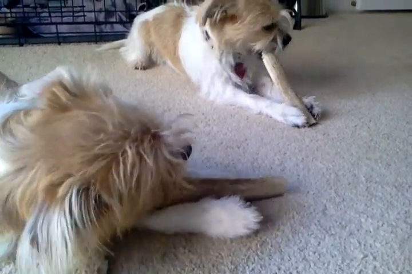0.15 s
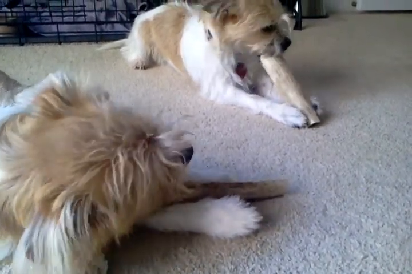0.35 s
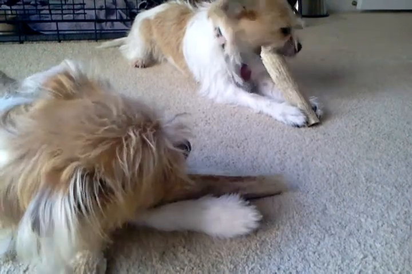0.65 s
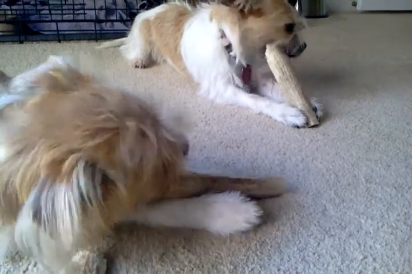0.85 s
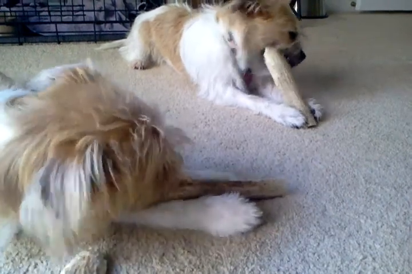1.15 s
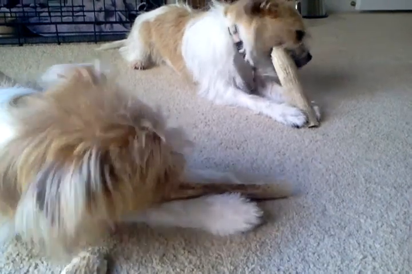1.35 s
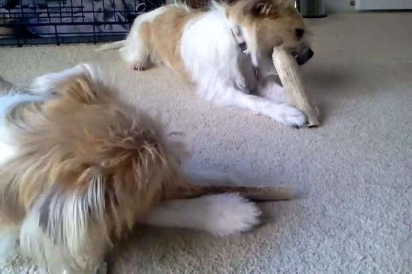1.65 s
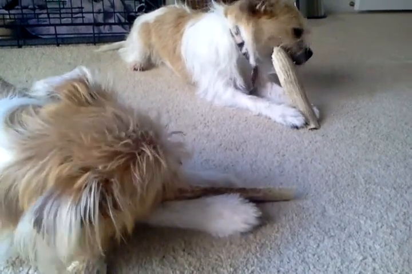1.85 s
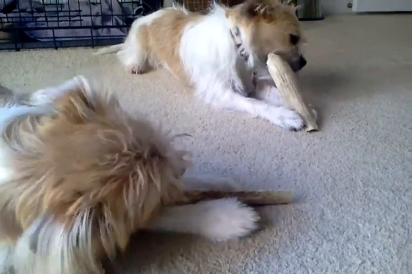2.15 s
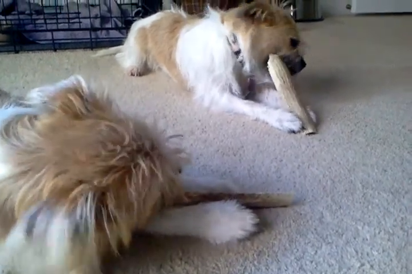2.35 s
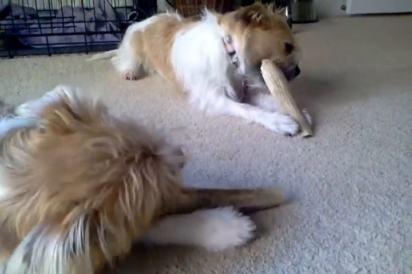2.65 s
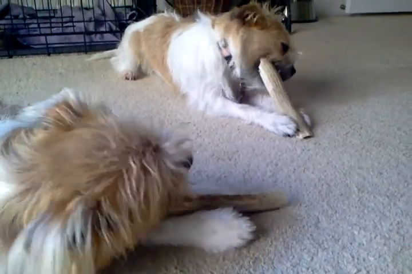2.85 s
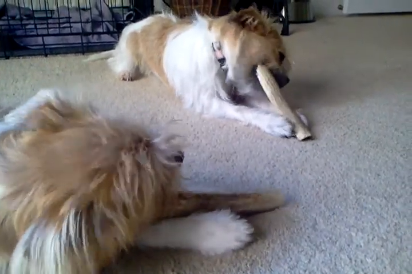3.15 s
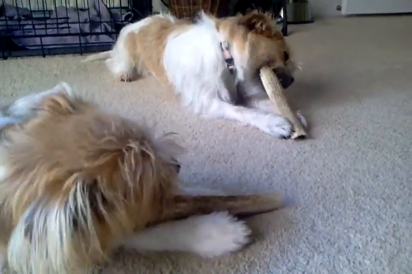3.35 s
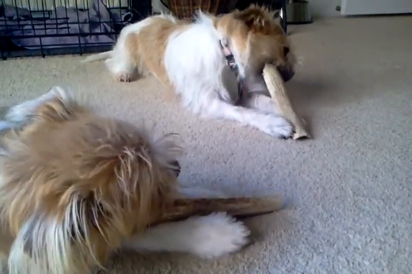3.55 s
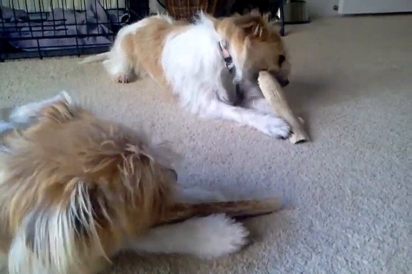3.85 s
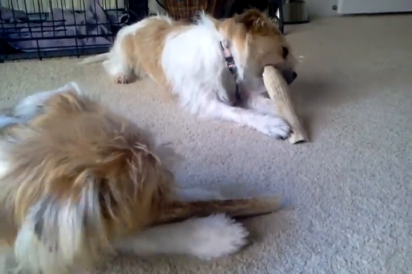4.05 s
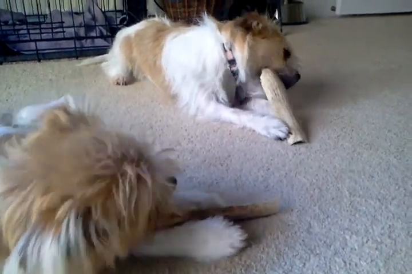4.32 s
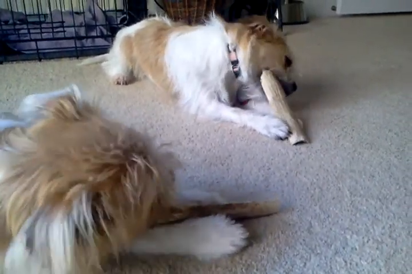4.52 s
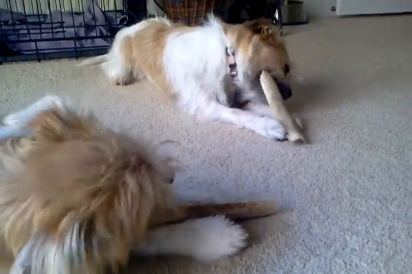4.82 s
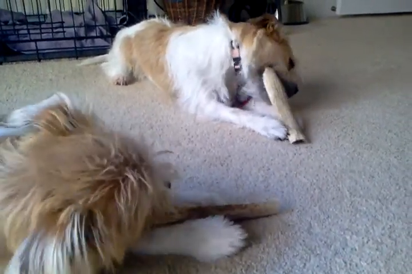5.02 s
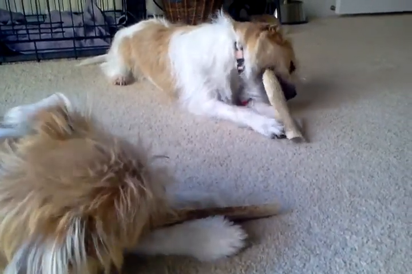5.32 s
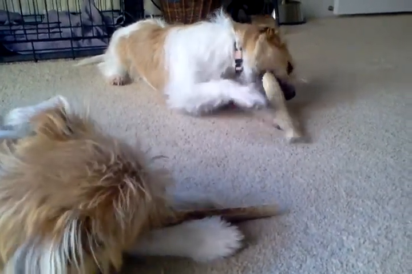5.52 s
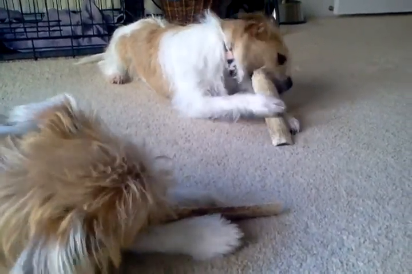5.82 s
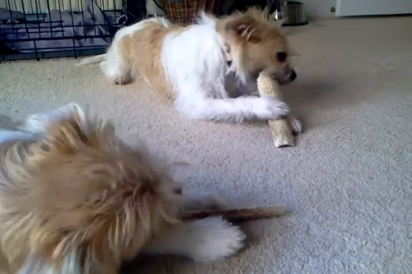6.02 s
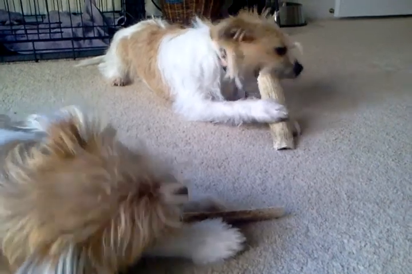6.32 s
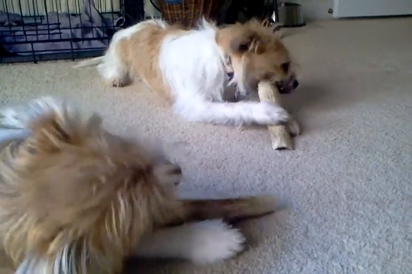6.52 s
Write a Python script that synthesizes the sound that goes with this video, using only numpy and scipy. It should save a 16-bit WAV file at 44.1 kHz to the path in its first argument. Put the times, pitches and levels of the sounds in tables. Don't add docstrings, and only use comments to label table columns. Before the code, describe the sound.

A quiet carpeted room with gentle hiss, low house hum and a very short, faint tail, heard through a dull narrow-band microphone. A near dog gnaws a hard antler: dry, bright tooth ticks with tiny rings, and barely audible gritty gnawing between. Light clicks scatter from 0.2 to 0.5 s, then a small cluster with hollow knocks around 0.7-0.8. A firmer click lands at 1.35, with weaker ones to 1.9. At 2.15 a brief skid leads into by far the loudest sound, a sharp splintering crack. At 2.6 a hard double bite comes with a low, short thump on the floor. Softer ticks follow, then a firm cluster at 3.9 with a hollow knock. Isolated clicks come at 4.2, 4.5, 4.8 and 5.3, more around 5.5-5.9, and faint low ticks to the end near 6.6. Throughout, a farther dog adds faint, noisy ticks.

```python
import sys
import numpy as np
from scipy import signal
from scipy.fft import rfft, irfft
from scipy.io import wavfile
from scipy.ndimage import map_coordinates

SR = 44100
rng = np.random.default_rng(int(sys.argv[2]) if len(sys.argv) > 2 else 0)


def persist_wave(psi):
    counts = np.round(np.clip(psi, -1, 1) * 32767).astype(np.int16)
    wavfile.write(sys.argv[1], SR, np.atleast_2d(counts).T)


def makeup_ratio(level_db):
    decades = np.asarray(level_db, float) / 20
    return 10 ** decades


N = 294588


def resonate(x, hz, width_hz):
    r = np.exp(-np.pi * width_hz / SR)
    feedback = [1, -2 * r * np.cos(2 * np.pi * hz / SR), r * r]
    return signal.lfilter([(1 - r * r) / 2, 0, (r * r - 1) / 2], feedback, x)


def add(out, start_s, sound):
    i = int(start_s * SR)
    out[i:i + len(sound)] += sound[:N - i]


def contacts(rows, splinter_s, splinter_db, crack_db, widen, mode_db=0, mode_width_hz=350):
    out, t = np.zeros(N), np.arange(900) / SR
    chance = rng.standard_normal((len(rows), 900))
    for (start_s, peak_db, snap_hz, width_hz, *modes_hz), noise in zip(rows, chance):
        force = makeup_ratio(splinter_db) * noise * np.exp(-t / splinter_s)
        force[12] = np.sign(noise[0])
        snap = resonate(force, snap_hz, widen * width_hz)
        snap = resonate(snap, snap_hz, widen * width_hz)
        crack = resonate(resonate(force, 3000, 5000), 3000, 5000)
        sound = snap / abs(snap).max() + makeup_ratio(crack_db) * crack / abs(crack).max()
        for k, mode_hz in enumerate(modes_hz):
            ring = resonate(force, mode_hz, mode_width_hz)
            sound += makeup_ratio(mode_db - 3 * k) * ring / abs(ring).max()
        add(out, start_s - .0004, makeup_ratio(peak_db) * sound / abs(sound).max())
    return out


def gripped(ticks, antler_hz):
    rows = []
    for start_s, peak_db, tooth_hz in ticks:
        snap_hz = tooth_hz + 0.19 * (antler_hz - tooth_hz)
        width_hz = 700 + 0.96 * abs(antler_hz - tooth_hz)
        rows.append((start_s, peak_db, snap_hz, width_hz, tooth_hz, antler_hz))
    return rows


def tooth_ticks():
    # start_s, peak_db, tooth_hz
    base_ticks = [(.2269, -38.5, 6000), (.433, -42, 4470), (.9356, -39.5, 4560), (2.5969, -24, 3620),
                  (2.605, -36, 2370), (2.6088, -33, 2370), (3.0631, -36.5, 4770), (3.6317, -42, 2760),
                  (3.8888, -29, 5220), (3.894, -25, 5100), (4.239, -39, 6000), (5.5496, -35, 5400),
                  (5.8194, -27, 5200), (5.8666, -45, 5340), (5.9037, -37.5, 2850), (6.4726, -39, 2080),
                  (6.5627, -39, 2000), (6.6106, -41, 2200), (6.6383, -34.5, 2570)]
    # start_s, peak_db, tooth_hz
    shaft_ticks = [(.2732, -40.5, 2430), (.3569, -40, 2580), (.4416, -31.5, 5630), (.7236, -34, 2880),
                   (.7609, -39, 6380), (.8139, -26.5, 5230), (.8221, -32, 2550), (.9844, -41.5, 2930),
                   (1.3493, -24, 2720), (1.592, -34, 3520), (1.9345, -39.5, 3700), (1.9421, -40, 3140),
                   (2.1456, -18, 3380), (2.1507, -23, 2950), (2.368, -39, 3250), (3.0388, -45, 3190),
                   (3.7314, -41, 3170), (5.2931, -46, 3600), (6.1049, -42, 2960), (6.1873, -39, 3100)]
    # start_s, peak_db, tooth_hz
    neck_ticks = [(.7859, -40.5, 2070), (1.3585, -45, 2000), (1.7427, -36, 2370), (2.702, -36.5, 3700),
                  (2.835, -37, 2460), (3.8812, -26.5, 4280), (4.2255, -30.5, 2180), (4.5317, -31.5, 3350),
                  (5.2476, -37.5, 3280), (5.3461, -32, 1920), (5.9152, -45, 3070), (5.9292, -26.5, 3120)]
    # start_s, peak_db, tooth_hz
    tip_ticks = [
        (.4386, -32, 5560),
        (.8199, -33, 5090),
        (2.5928, -18.5, 4550),
        (3.8917, -24, 5100),
        (4.8274, -37.5, 5260),
        (5.4884, -32, 5270),
        (5.6625, -29.5, 5300),
    ]
    rows = gripped(base_ticks, antler_hz=3230) + gripped(shaft_ticks, antler_hz=4270)
    rows += gripped(neck_ticks, antler_hz=5520) + gripped(tip_ticks, antler_hz=6260)
    return contacts(rows, splinter_s=.0012, splinter_db=-18, crack_db=-10, widen=1.5,
                    mode_db=-1, mode_width_hz=520)


def splinter_breaks():
    # start_s, peak_db, snap_hz, snap_width_hz, first_mode_hz, second_mode_hz
    breaks = [
        (2.1539, -5, 3400, 1250, 2950, 5200),
        (3.9175, -34, 3700, 2400, 3030, 5170),
    ]
    return contacts(breaks, splinter_s=.001, splinter_db=-24, crack_db=-12, widen=1.5,
                    mode_db=-5, mode_width_hz=430)


def hollow_knocks():
    # start_s, peak_db, snap_hz, snap_width_hz
    knocks = [(0.2738, -34, 804, 580), (0.786, -32, 970, 670), (0.8205, -40.5, 735, 1250),
              (1.3492, -30, 1060, 534), (1.3587, -35.5, 950, 790), (1.5919, -39, 1480, 1050),
              (1.743, -37.5, 1230, 370), (2.1462, -24, 1000, 620), (2.1538, -21, 1220, 1140),
              (2.3821, -38, 1780, 1210), (2.4152, -38, 630, 1190), (2.5887, -28, 990, 1200),
              (2.5968, -24.5, 375, 402), (2.8343, -41.5, 1060, 610), (3.8814, -34, 1920, 590),
              (3.8989, -25.5, 1320, 1160), (4.2268, -37, 760, 1450), (4.5316, -36, 1420, 1040),
              (4.8129, -37, 575, 735), (5.3457, -31.5, 970, 1090), (5.9036, -37.5, 714, 597),
              (5.916, -37, 1120, 540), (6.0297, -44.5, 650, 680), (6.1874, -45, 520, 500),
              (6.6106, -50, 1880, 1170), (6.6383, -37, 1080, 920)]
    return contacts(knocks, splinter_s=.0015, splinter_db=-18, crack_db=-22, widen=1.45)


def far_dog_ticks():
    # start_s, peak_db, snap_hz
    far_ticks = [(.0867, -56, 3550), (.316, -49, 6180), (1.1303, -51, 3530), (1.3744, -56, 3730),
                 (1.9685, -51, 3710), (2.345, -46, 4240), (2.878, -48, 3750), (3.0684, -53, 5460),
                 (3.1535, -44.5, 5500), (3.6134, -51, 4830), (4.373, -46, 6100), (4.5575, -48, 5680),
                 (4.6595, -48, 3550), (4.8125, -46, 6200), (4.9864, -47, 3500), (5.1883, -45, 4900),
                 (5.3374, -43, 6010), (5.5584, -46, 5250), (5.7326, -46, 3600), (6.1543, -48, 3630),
                 (6.204, -49.5, 5300)]
    rows = [(start_s, peak_db, snap_hz, 2500) for start_s, peak_db, snap_hz in far_ticks]
    return contacts(rows, splinter_s=.0022, splinter_db=-4.5, crack_db=-10, widen=1.1)


def scrapes():
    # start_s, length_s, rms_db, ring_hz, ring_width_hz
    skids = [(1.355, 0.019, -50, 1210, 1510), (1.356, 0.0091, -52, 5930, 1500),
             (2.146, 0.01, -32.5, 3970, 3000), (2.1466, 0.0091, -39, 1000, 700),
             (2.5885, 0.0073, -35.5, 4600, 3000), (2.5889, 0.014, -44.5, 2020, 2000),
             (2.597, 0.0045, -45, 5000, 3500), (3.886, 0.015, -40.5, 5200, 1600),
             (3.894, 0.0088, -38.5, 2470, 2000), (4.229, 0.0039, -52, 2000, 3500),
             (4.56, 0.0073, -56.5, 5960, 2000), (5.342, 0.0053, -50, 1410, 1800),
             (5.861, 0.016, -56, 5400, 1300), (5.745, 0.0096, -60, 1100, 900),
             (5.908, 0.015, -52, 1200, 1500), (6.199, 0.017, -57, 1300, 1500)]
    out = np.zeros(N)
    chance = rng.random((len(skids), 2, 1200))
    for (start_s, length_s, rms_db, ring_hz, width_hz), (when, size) in zip(skids, chance):
        slips = (when < 5000 / SR) * np.tan(0.65 * (size - .5))
        slips = slips * (np.arange(1200) < length_s * SR)
        ring = resonate(resonate(slips, ring_hz, width_hz), ring_hz, width_hz)
        rms = np.sqrt(np.sum(ring ** 2) / (length_s * SR))
        add(out, start_s, makeup_ratio(rms_db) * ring / rms)
    return out


def thumps():
    # start_s, peak_db, pitch_hz
    soft_blows = [(.274, -41.5, 560), (.2745, -38, 1020), (.8215, -43.5, 497), (1.3502, -42.5, 463),
                  (1.36, -43, 350), (2.156, -35, 355), (2.157, -39, 206), (2.599, -28, 1020),
                  (2.622, -43, 410), (3.899, -36, 1600), (3.9, -38, 417), (3.9185, -44, 600),
                  (3.9005, -39, 760), (4.226, -43, 212), (4.227, -39.5, 730), (4.228, -42.5, 457),
                  (4.532, -43.5, 337), (4.813, -41.5, 584), (5.346, -40.5, 453), (5.756, -44, 1116),
                  (6.188, -44.5, 467), (6.639, -48, 407)]
    # pitch_hz, peak_db, t60_s
    slam_modes = [
        (234, -45.5, 0.08),
        (290, -41, .28),
        (353, -27, .055),
        (440, -33, .025),
    ]
    slam_s, cycles = 2.5962, 13.8
    out, t = np.zeros(N), np.arange(SR // 4) / SR
    blows = [(start_s, db, hz, cycles / hz) for start_s, db, hz in soft_blows]
    blows += [(slam_s, db, hz, t60_s) for hz, db, t60_s in slam_modes]
    for start_s, peak_db, hz, t60_s in blows:
        envelope = makeup_ratio(peak_db - 60 * t / t60_s) * (1 - np.exp(-t / 0.00052))
        add(out, start_s, envelope * np.sin(2 * np.pi * hz * t))
    return out


def grit():
    contacts_per_s, level_db = 77, -52.5
    size_db = level_db + 3.5 * np.minimum(rng.exponential(1, N), 3)
    sizes = makeup_ratio(size_db) * rng.choice([-1, 1], N)
    born = rng.random(N) < contacts_per_s / SR
    dealt = rng.integers(0, 8, N)
    out = np.zeros(N)
    for k, hz in enumerate(np.geomspace(700, 6000, 8)):
        clicks = sizes * born * (dealt == k) + 1e-18
        out += resonate(clicks, hz, .5 * hz) * SR / (np.pi * hz)
    return out


def muffle(bites):
    return signal.sosfilt(signal.butter(2, 7000, fs=SR, output="sos"), bites)


def room(x):
    # delay_s, level_db
    echoes = [
        (.004, -20),
        (.0095, -31),
        (.018, -30),
        (.0280, -24),
        (.034, -27),
    ]
    # band_hz, t60_s
    tail_bands = [(300, 0.22), (1000, 0.26), (2500, 0.18), (5000, .22), (8000, 0.13)]
    tail_db = -47.5
    t = np.arange(SR // 2) / SR
    response, white = np.zeros(len(t)), rng.standard_normal((2, len(t)))
    for hz, t60_s in tail_bands:
        band = resonate(white[0], hz, 0.99 * hz)
        response += makeup_ratio(tail_db - 60 * t / t60_s) * band / band.std() * (1 - np.exp(-t / 0.018))
    for delay_s, level_db in echoes:
        response += makeup_ratio(level_db - 16) * white[1] * np.exp(-np.abs(t - delay_s) / .0012)
    return signal.fftconvolve(x, response)[:N]


def colour(x, points):
    table_hz, table_db = np.transpose(points)
    hz = np.fft.rfftfreq(len(x), 1 / SR)
    gain_db = np.interp(np.log(hz + 1), np.log(table_hz), table_db)
    return irfft(rfft(x) * makeup_ratio(gain_db), len(x))


def drift(rate_hz):
    knots = rng.standard_normal(400)
    return map_coordinates(knots, [np.arange(N) / SR * min(rate_hz, 50)], order=3)


def house():
    # pitch_hz, density_db (dB per Hz)
    spectrum = [(20, -33), (48, -19.5), (64, -21.5), (100, -6), (125, -11), (190, -3.5), (260, -7),
                (330, -8), (500, -15.5), (680, -9.5), (1500, -13.5), (2300, -12), (3800, -22.5),
                (9500, -25)]
    # time_s, level_db
    bustle = [(0.0, -1.5), (0.9, -0.04), (1.7, -0.4), (2.6, 1), (3.3, -.4), (5.3, 0.5), (5.95, 1.5),
              (6.68, 0.6)]
    bustle_db = np.interp(np.arange(N) / SR, *np.transpose(bustle))
    noise = colour(rng.standard_normal(N), spectrum)
    rumble = signal.sosfiltfilt(signal.butter(2, 400, fs=SR, output="sos"), noise)
    hiss = noise - rumble
    rumble_gain = makeup_ratio(-61 + 0.37 * bustle_db + 1.7 * drift(6))
    hiss_gain = makeup_ratio(-57 + bustle_db + .4 * drift(12))
    return rumble_gain * rumble / rumble.std() + hiss_gain * hiss / hiss.std()


def scene():
    bites = tooth_ticks() + splinter_breaks() + hollow_knocks() + far_dog_ticks()
    bites += scrapes() + thumps() + grit()
    bites = muffle(bites)
    return (bites + room(bites) + house())[None]


def roll_off(x):
    return signal.sosfilt(signal.butter(12, 8920, fs=SR, output="sos"), x)


def record(dry):
    # pitch_hz, gain_db
    response = [(25, -9), (45, 0.5), (5500, 0), (7000, -2.5), (7600, -16), (7950, -23.5), (8050, -56),
                (8250, -23), (8700, -27.5), (9000, -50), (9300, -75), (20000, -85)]
    mix = colour(dry[0], response)[None]
    return roll_off(mix)


dry = scene()
out = record(dry)
persist_wave(out)
```